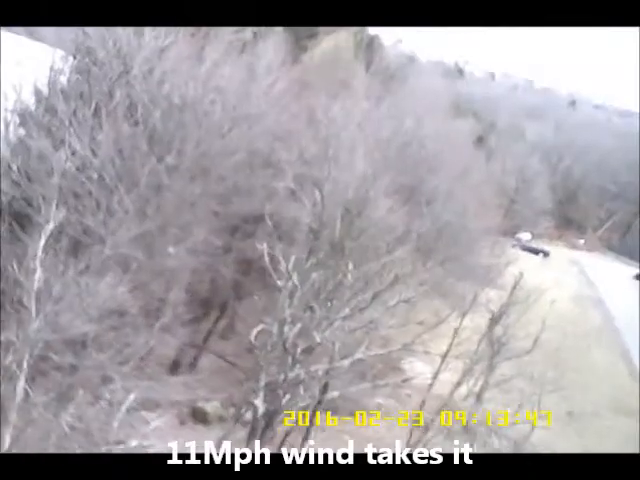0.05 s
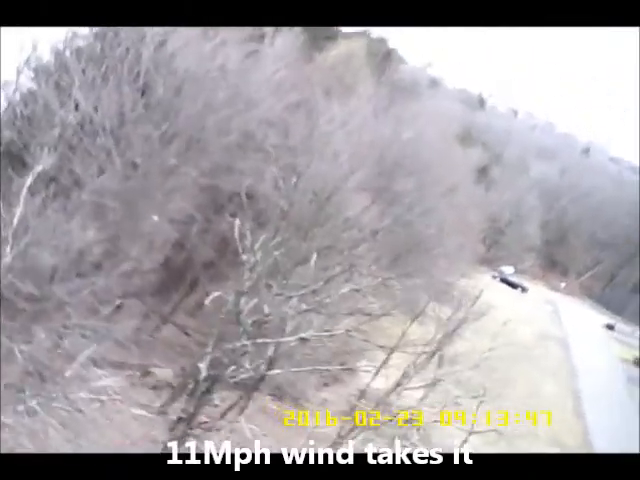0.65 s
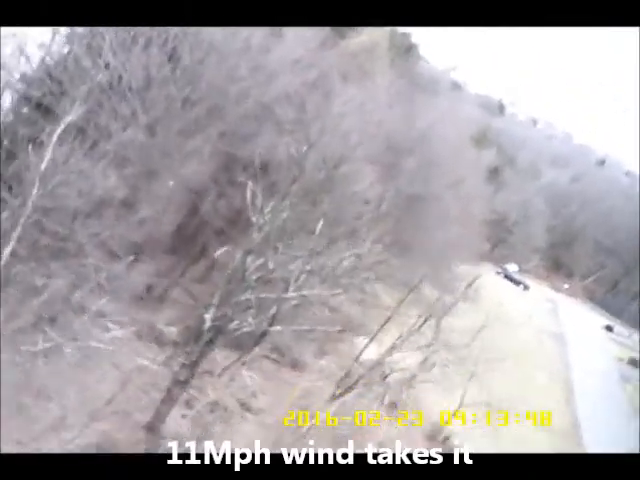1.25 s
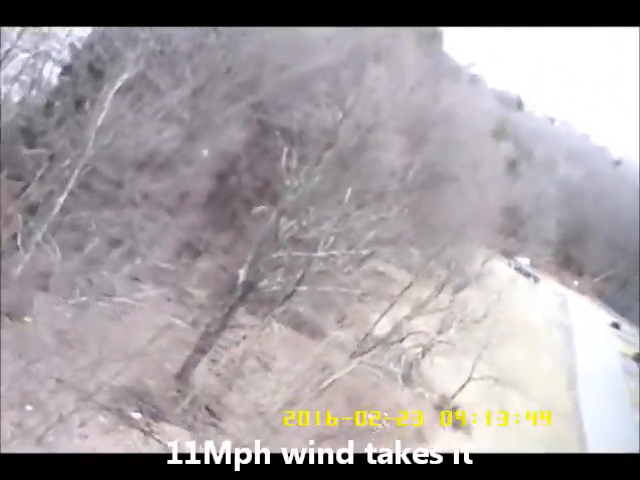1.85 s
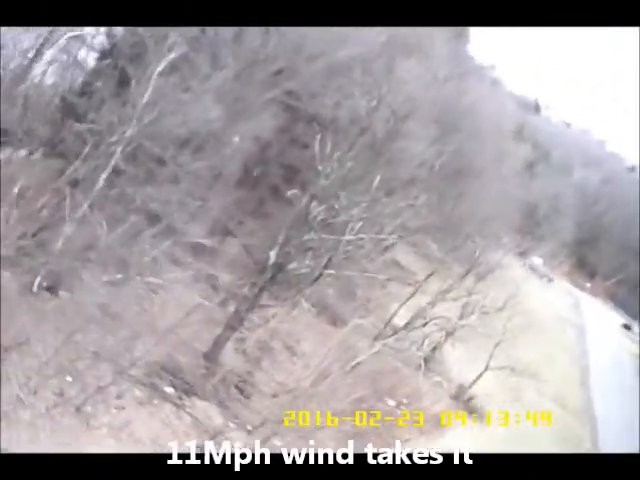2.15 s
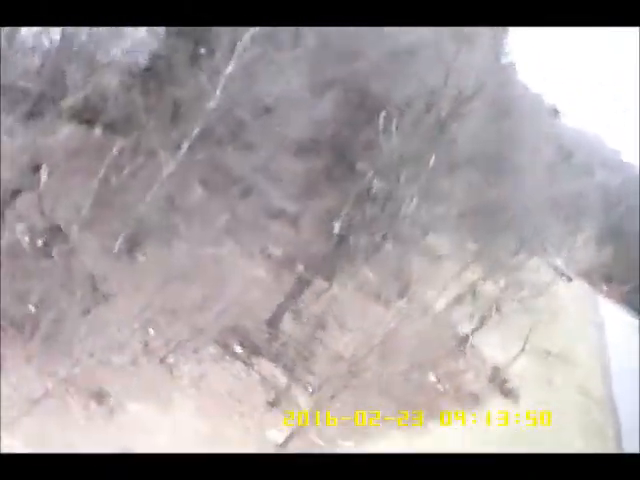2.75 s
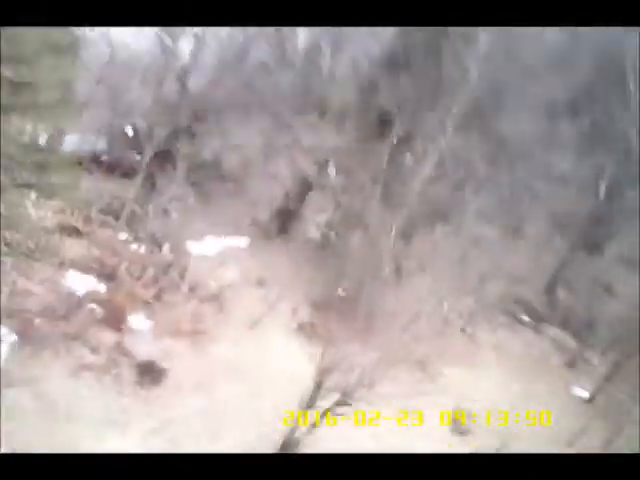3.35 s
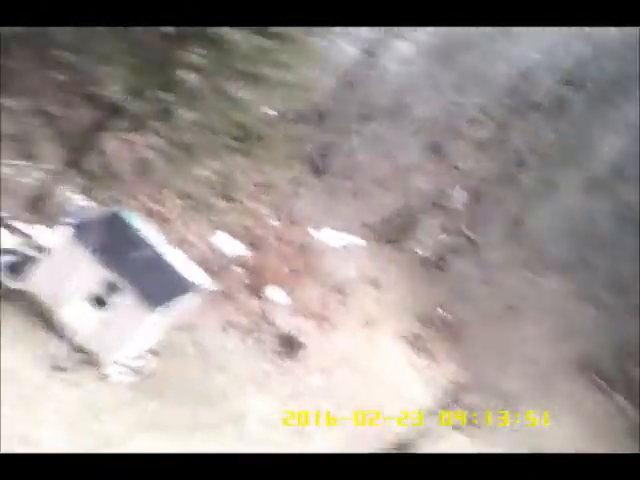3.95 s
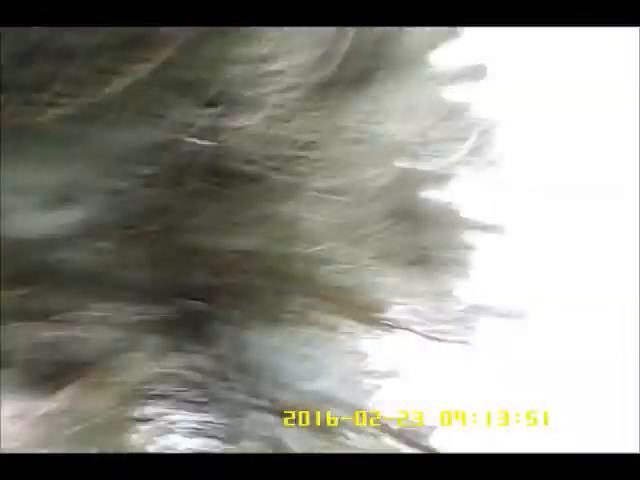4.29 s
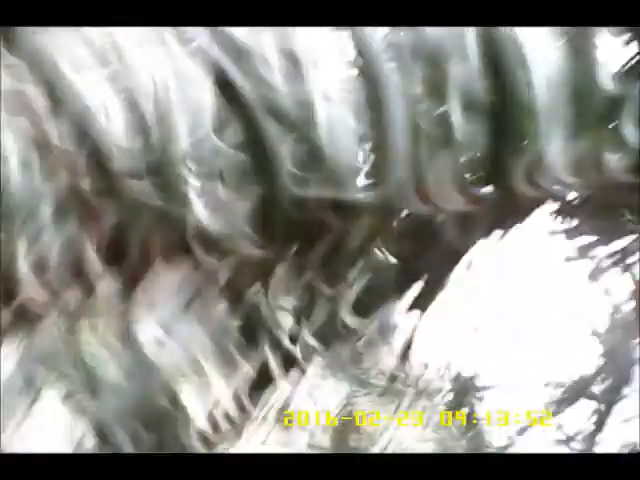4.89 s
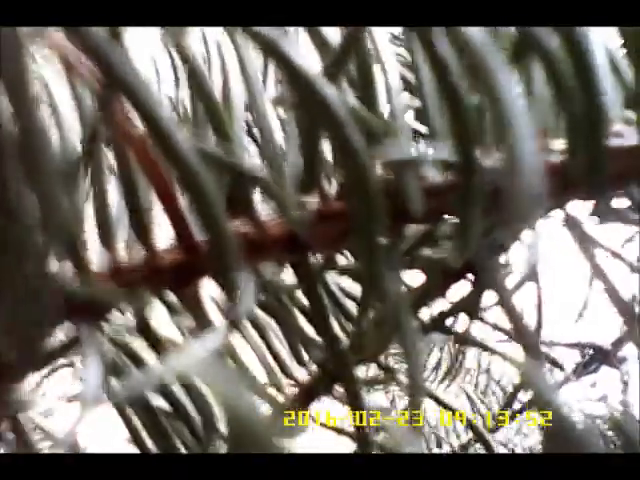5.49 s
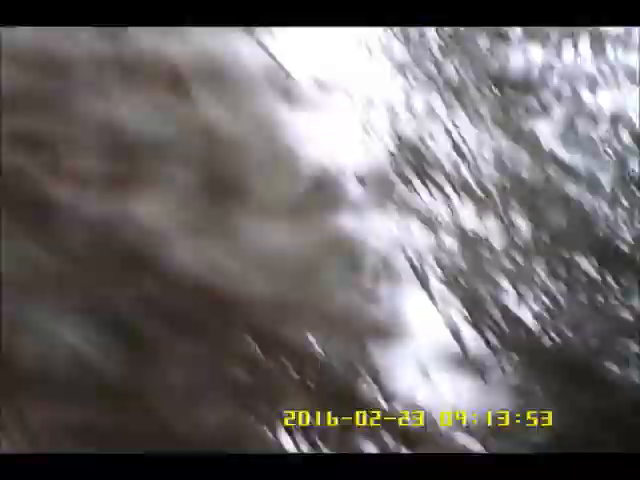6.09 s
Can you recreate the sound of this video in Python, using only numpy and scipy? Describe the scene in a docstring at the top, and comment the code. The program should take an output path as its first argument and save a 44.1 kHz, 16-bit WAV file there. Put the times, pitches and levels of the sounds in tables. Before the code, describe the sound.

From the start, a toy drone's geared rotors whir loudly in gusty outdoor wind. Its onboard microphone is dull and badly overloaded, so motors and buffeting merge into a harsh, flat roar. At about 3.1 seconds the throttle cuts briefly and the roar dips, with two cracking jolts, before returning by 3.3 seconds. At about 4.4 seconds the drone drops into a pine and the roar collapses. The propellers chop weakly into needles and stop just after 5 seconds. Meanwhile, choppy bursts of scraping needles and low rumbling from rocking boughs alternate with short lulls. Twigs knock on the plastic shell as sharp cracks, clustering between 4.8 and 5 seconds. After a brief lull, more scrapes and knocks follow, with a bright snap near 5.4 seconds and a few short twangs. A harsh, longer slide through the branches comes around 5.9 to 6.1 seconds.

```python
"""A toy drone's four geared rotors whir in gusty wind; it jolts twice as its throttle cuts and returns,
then drops into a pine. Periodic tooth impacts shake its shell, and eddies press on its camera's microphone.
In the tree, boughs rock the body, needles scrape by stick-slip friction, and twigs knock, snap and twang.
The camera's 8 kHz samples overflow and wrap around, so that flight becomes a harsh, flat roar
and each hard knock becomes a crack."""
import sys
import numpy as np
from scipy import signal
from scipy.fft import rfft, irfft
from scipy.io import wavfile

SR = 44100
rng = np.random.default_rng(int(sys.argv[2]) if len(sys.argv) > 2 else 0)


def wav_out(sig):
    """Save sig, one row per channel (or a flat mono array), as 16-bit PCM at SR to the path in sys.argv[1]."""
    wavfile.write(sys.argv[1], SR, np.round(np.clip(np.atleast_2d(sig).T, -1, 1) * 32767).astype(np.int16))


N = 270333
CAMERA_SR = 8000
TIME = np.arange(N * CAMERA_SR // SR + 2) / CAMERA_SR

# Response of the plastic shell. Each row: frequency in Hz, relative gain in dB.
SHELL_RESPONSE = [(30, -14), (200, -3), (600, -6), (1100, -8), (1550, 1), (1900, -2), (2350, -11),
                  (2800, -9), (3150, -11), (3750, -4), (4000, -5.5)]


def motors(rotors=4, turn_hz=71.85, turn_db=-15, speed_law=.085, drift=.008, rattle=.3, flutter_db=2.0):
    """Gear meshing: uneven tooth clicks repeat every turn and form harmonics; loose play adds rattle."""
    # Propellers chopping into needles. Each row: centre and half length in seconds, level in dB.
    needle_chops = [(4.552, 0.014, -25.5), (4.598, 0.018, -22), (4.671, 0.021, -36), (4.757, 0.022, -30),
                    (5.025, .02, -46)]
    gears, level_db = np.zeros(len(TIME)), motor_level()
    mean_hz = turn_hz * gain_of(level_db - turn_db) ** speed_law  # speed follows a power of the level
    for _ in range(rotors):
        speed_hz = mean_hz * (1 + drift * wander(3))
        angle = 2 * np.pi * np.cumsum(speed_hz) / CAMERA_SR
        for order in range(2, 96):
            below_nyquist = order * speed_hz < CAMERA_SR / 2
            gears += below_nyquist * rng.rayleigh() * np.cos(order * angle + 2 * np.pi * rng.random())
    whir = unit_rms(coloured(unit_rms(gears) + rattle * white(), SHELL_RESPONSE))
    chops = sum(gain_of(db) * swell(s, half_length) for s, half_length, db in needle_chops)
    return whir * (gain_of(level_db) + chops) * gain_of(flutter_db * wander(30))


def motor_level(cut_db=-20, stall_db=-22):
    """Drive and load set the whir's level in dB: it follows the throttle and falls as needles choke it."""
    # The throttle in flight. Each row: time in seconds, level in dB before the drops below.
    throttle = [(0, -15), (2.3, -15.5), (2.8, -14), (3.07, -21), (3.24, -19), (3.4, -14.5), (3.95, -12),
                (4.12, -19), (4.43, -19)]
    flight_db = np.interp(TIME, *np.transpose(throttle))
    return flight_db + cut_db * throttle_cut() + stall_db * in_tree() + run_down()


def throttle_cut():
    """A gate with sloping edges: 1 while the throttle is cut, 0 otherwise."""
    return trapezoid(3.066, 3.258, attack=.044, release=.055)


def in_tree(crash_s=4.43, ramp_s=.025):
    """A linear ramp from 0 in flight to 1 in the pine."""
    return np.clip((TIME - crash_s) / ramp_s, 0, 1)


def run_down(switch_off_s=5.05, db_per_s=-190, floor_db=-36):
    """Exponential decay: the drop in dB as the propellers coast down."""
    return np.maximum(db_per_s * np.maximum(TIME - switch_off_s, 0), floor_db)


def wind(steady_db=-11, cut_db=-20.5, shelter_db=-26, eddy_db=3.5):
    """Turbulence: eddies beat on the microphone port, easing with the throttle and inside the tree."""
    # Spectrum of the eddy pressure. Each row: frequency in Hz, relative level in dB.
    buffet_spectrum = [(10, -10), (30, -2), (90, 0), (180, -4), (400, -18), (1000, -32), (4000, -56)]
    # Strong gusts. Each row: centre and half length in seconds, rise in dB.
    gusts = [(3.03, .1, 10), (4.199, .12, 9)]
    gust_db = sum(db * swell(s, half_length) for s, half_length, db in gusts)
    level_db = steady_db + gust_db + cut_db * throttle_cut() + shelter_db * in_tree() + run_down()
    return unit_rms(coloured(white(), buffet_spectrum)) * gain_of(level_db + eddy_db * wander(14))


def branches(sway_db=-1.1, rustle_db=-49, force_limit=.125):
    """Compliant contact: boughs rock and brush the body, and their bending limits the force."""
    # Boughs leaned on. Each row: start and end in seconds, rocking and scraping levels in relative dB.
    boughs = [(4.436, 4.468, -25, -41), (4.551, 4.66, -32.5, -36), (4.65, 4.706, -27, -30),
              (4.717, 4.8, -28, -32), (4.792, 4.955, -26, -26), (5.186, 5.26, -26.5, -38.5),
              (5.292, 5.33, -26, -36), (5.345, 5.504, -25.5, -25.5), (5.542, 5.685, -26.5, -35.5),
              (5.703, 5.766, -27.5, -43), (5.811, 5.86, -24, -32), (5.863, 6.105, -27.5, -25)]
    # Spectrum of the rocking body. Each row: frequency in Hz, relative level in dB.
    body_spectrum = [(10, -9.5), (35, -1.5), (100, -1.5), (190, -5), (320, -8.5), (500, -21.5), (1000, -40),
                     (4000, -71)]
    rocking = np.max([gain_of(db) * contact(start, end, -140) for start, end, db, _ in boughs], axis=0)
    scrape = np.max([gain_of(db) * contact(start, end, -290) for start, end, _, db in boughs], axis=0)
    sway = unit_rms(coloured(white(), body_spectrum)) * gain_of(sway_db) * rocking
    brushing = needle_slips() * (scrape + gain_of(rustle_db) * in_tree())  # needles never lie still
    return force_limit * np.tanh((sway + brushing) / force_limit)


def contact(start, end, db_per_s, build_s=.014):
    """The load on one bough builds linearly, holds, and decays exponentially after end."""
    return np.clip((TIME - start) / build_s, 0, 1) * gain_of(db_per_s * np.maximum(TIME - end, 0))


def rakes(edge_s=0.0043, force_limit=.24):
    """Sliding friction: the drone's weight drags over needles, and the bending bough limits the force."""
    # Hard slides through a bough. Each row: start and end in seconds, level in dB before limiting.
    slides = [(4.584, 4.612, -23.5), (4.899, 4.917, -24.5), (5.213, 5.231, -27), (5.671, 5.692, -33),
              (5.861, 5.915, -21.5), (5.915, 5.949, -17.5), (5.95, 6.018, -15.5), (6.017, 6.07, -18.5)]
    load = sum(gain_of(db) * trapezoid(start, end, edge_s, edge_s) for start, end, db in slides)
    return force_limit * np.tanh(load * needle_slips() / force_limit)


def needle_slips(clump_db=2.0, grain_db=4.5):
    """Stick-slip friction: needles cross the shell in clumps of tiny slips, here at rms 1."""
    # Spectrum of the scraping needles. Each row: frequency in Hz, relative level in dB.
    needle_spectrum = [(30, -11.5), (200, -1.5), (400, 1), (750, -0.5), (1200, -7.5), (1600, -10),
                       (2000, -12.5), (2450, -32), (3100, -37), (3750, -28), (4000, -40)]
    grains = white() * gain_of(clump_db * wander(60) + grain_db * wander(600))
    return unit_rms(coloured(grains, needle_spectrum))


def knocks(push, thump_hz=110, scratch=.28, rebound_s=.0072):
    """Impact: each tap is a short, gritty pulse, signed like the push already acting on the drone."""
    # Sharp knocks on the body: two jolts as the throttle cuts and returns, then twig hits in the pine.
    # Each row: time in seconds, level in dB, half length in seconds, tap count.
    body_knocks = [(3.122, -16, 0.00082, 1), (3.226, -12.5, 0.0022, 1), (4.552, -15, .002, 1),
                   (4.653, -17.5, 0.00053, 1), (4.685, -15.5, .0008, 2), (4.82, -16, 0.0022, 1),
                   (4.841, -17.5, .0016, 1), (4.861, -14, 0.00087, 1), (4.879, -16, 0.00077, 2),
                   (4.904, -13.5, .0023, 1), (4.929, -18, .0016, 1), (4.948, -15, 0.00079, 1),
                   (4.967, -15.5, 0.00093, 1), (5.3, -16.5, .0006, 2), (5.363, -18, 0.001, 1),
                   (5.3764, -18.5, 0.0016, 1), (5.455, -16.5, .001, 4), (5.494, -17, 0.00091, 1),
                   (5.529, -14, 0.00066, 1), (5.585, -16.5, 0.00087, 1), (5.8384, -15.5, 0.0011, 2),
                   (6.09, -16.5, 0.0011, 2), (6.110, -15.5, 0.00095, 1)]
    out, grit = np.zeros(len(TIME)), unit_rms(coloured(white(), SHELL_RESPONSE))
    for first, db, half_length, taps in body_knocks:
        for s in first + rebound_s * np.arange(round(taps)):
            t = TIME - s
            pulse = np.exp(-.5 * (t / half_length) ** 2)
            shove = pulse * (np.cos(2 * np.pi * thump_hz * t) + scratch * grit)
            out += np.sign(np.interp(s, TIME, push)) * gain_of(db) * shove
    return out


def snaps(ring_hz=2900, decay_s=0.0012):
    """Brittle fracture: a dry twig breaks with one bright, very short ring."""
    # Breaking twigs. Each row: time in seconds, starting level in dB.
    fractures = [(5.4189, -4), (5.811, -41)]
    return sum(ring(s, ring_hz, db, decay_s) for s, db in fractures)


def twangs(decay_s=.017):
    """Free vibration: a bent twig slips off the shell and rings at its natural frequency."""
    # Twigs springing free. Each row: time in seconds, frequency in Hz, starting level in dB.
    releases = [(4.962, 715, -22), (5.434, 618, -24), (5.674, 324, -22.5), (5.92, 572, -21.5)]
    return sum(ring(s, hz, db, decay_s) for s, hz, db in releases)


def downwash(level_db=-39):
    """Flow noise: air rushes smoothly past the body in flight, unmasked when the whir drops."""
    # Spectrum of the rushing air. Each row: frequency in Hz, relative level in dB.
    rush_spectrum = [(100, -10), (500, 0), (1100, 0), (1600, -4), (2300, -7), (2700, -16), (4000, -22)]
    return gain_of(level_db) * unit_rms(coloured(white(), rush_spectrum)) * (1 - in_tree())


def ring(s, hz, db, decay_s):
    """A damped oscillator set ringing at time s."""
    t = np.maximum(TIME - s, 0)
    return gain_of(db) * np.exp(-t / decay_s) * np.sin(2 * np.pi * hz * t)


def trapezoid(start, end, attack, release):
    """An envelope that rises from 0 to 1 after start and is back at 0 by end."""
    return np.clip(np.minimum((TIME - start) / attack, (end - TIME) / release), 0, 1)


def swell(s, half_length):
    """A Gaussian bell of height 1 around time s."""
    return np.exp(-((TIME - s) / half_length) ** 2)


def wander(hz):
    """Low-pass noise of rms 1: a random fluctuation up to about hz."""
    bins = np.fft.rfftfreq(len(TIME), 1 / CAMERA_SR)
    return unit_rms(irfft(rfft(white()) / (1 + (bins / hz) ** 4), len(TIME)))


def white():
    """White noise of rms 1."""
    return rng.standard_normal(len(TIME))


def coloured(x, spectrum, rate=CAMERA_SR):
    """Zero-phase filtering by (Hz, dB) points joined on a logarithmic frequency axis."""
    hz, db = np.transpose(spectrum)
    bins = np.fft.rfftfreq(len(x), 1 / rate)
    return irfft(rfft(x) * gain_of(np.interp(np.log(bins + 1), np.log(hz + 1), db)), len(x))


def unit_rms(x):
    """Scales to rms 1."""
    return x / np.sqrt(np.mean(x ** 2) + 1e-20)


def gain_of(db):
    """Decibels to amplitude."""
    return 10 ** (np.asarray(db) / 20)


def scene():
    """Superposition: all sources add at one microphone inside the drone's body."""
    push = wind() + branches() + rakes()
    return signal.resample(motors() + downwash() + push + knocks(push) + snaps() + twangs(), N)[None]


def record(dry, mic_rail=1.17, leak=0.084, full_scale=.146, hiss_db=-66, noise_floor_db=-96):
    """Nonlinear distortion: the microphone saturates, the samples wrap, and the output stage clips."""
    # Response of the output stage. Each row: frequency in Hz, gain in dB.
    output_response = [(20, -1), (55, 1.5), (80, 1.5), (130, 2), (220, 0), (1000, -0.5), (3700, -0.76),
                       (5000, -0.3), (8000, -0.7), (12000, -1), (16000, -0.5)]
    pressure = signal.resample(dry[0], len(TIME))
    # in the hardest gusts the microphone sits on its rail and passes only a little of the whir
    saturated = (1 - leak) * np.clip(pressure, -mic_rail, mic_rail) + leak * pressure
    samples = saturated + gain_of(hiss_db) * white()
    # a sample past full scale comes back in from the opposite side
    wrapped = (samples + full_scale) % (2 * full_scale) - full_scale
    smoothing = signal.firwin(441 * 60 + 1, 3890, window=("kaiser", 8), fs=441 * CAMERA_SR)
    smooth = signal.resample_poly(wrapped, 441, 80, window=smoothing)[:N]  # up to SR
    # clipping the overshoot of each jump spreads sound above 4 kHz
    clipped = np.clip(smooth, -full_scale, full_scale)
    noise_floor = gain_of(noise_floor_db) * rng.standard_normal(N)  # faint and steady
    out = coloured(clipped, output_response, SR) + noise_floor
    low_pass = signal.firwin(511, 15900, window=("kaiser", 9), fs=SR)
    return signal.oaconvolve(out, low_pass, "same")[None]


dry = scene()
out = record(dry)
wav_out(out)
```